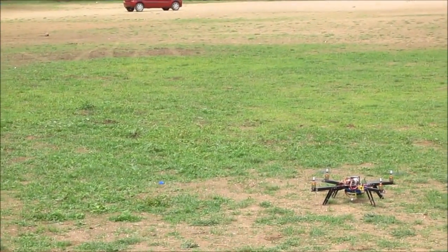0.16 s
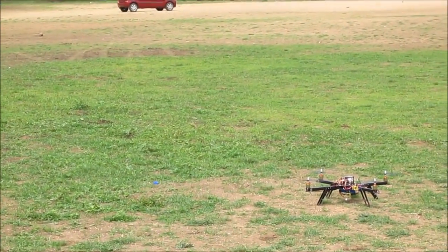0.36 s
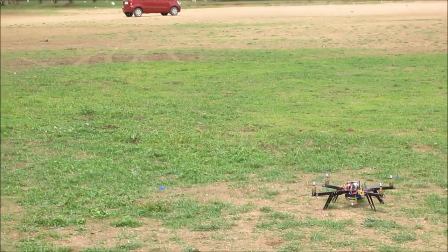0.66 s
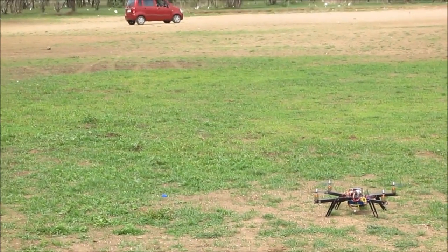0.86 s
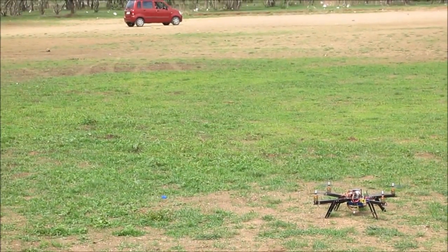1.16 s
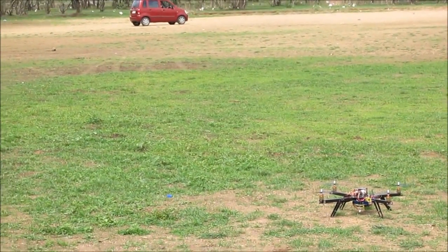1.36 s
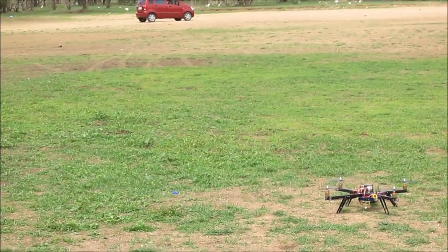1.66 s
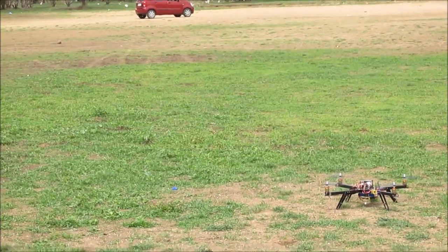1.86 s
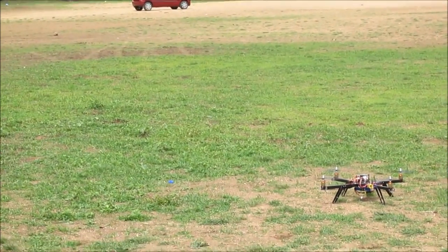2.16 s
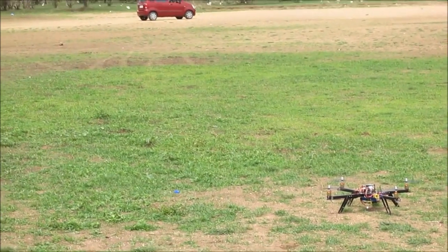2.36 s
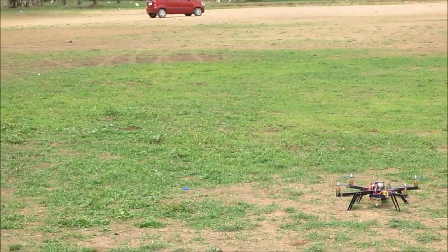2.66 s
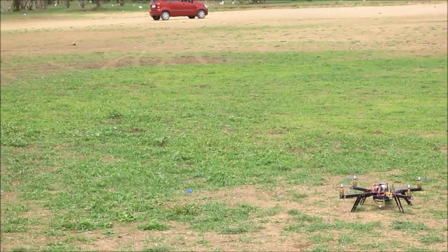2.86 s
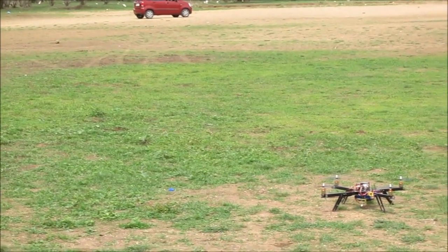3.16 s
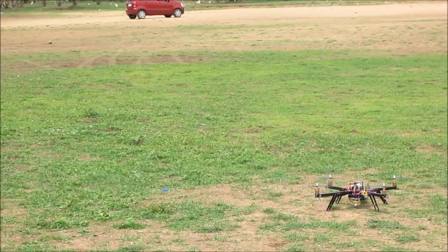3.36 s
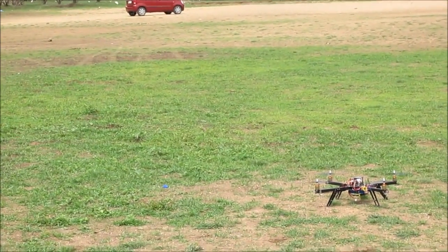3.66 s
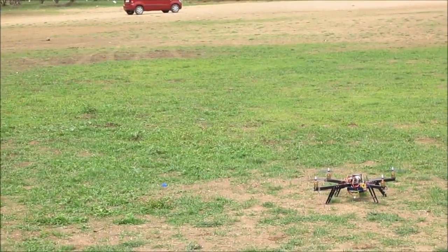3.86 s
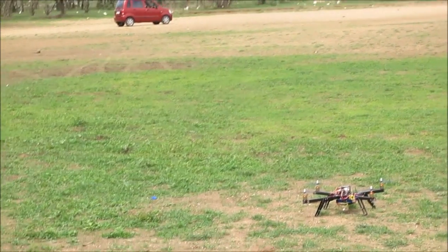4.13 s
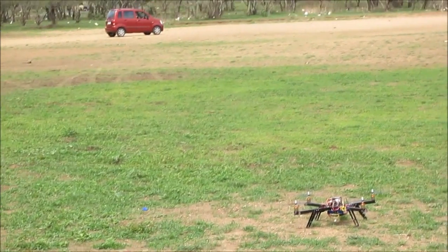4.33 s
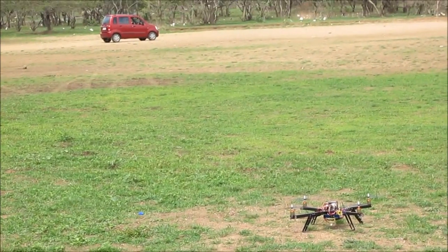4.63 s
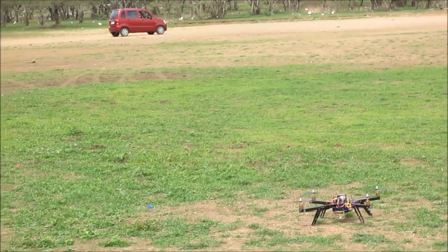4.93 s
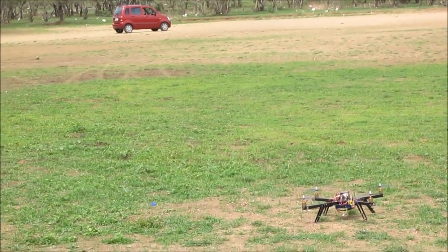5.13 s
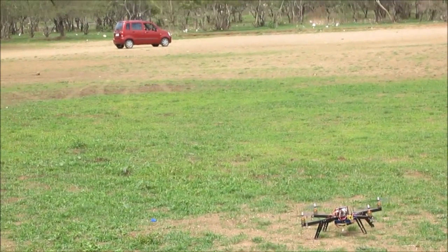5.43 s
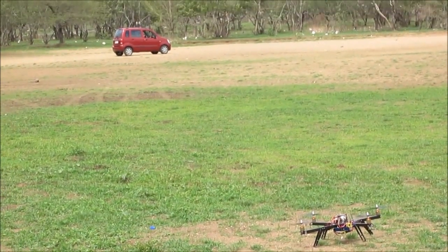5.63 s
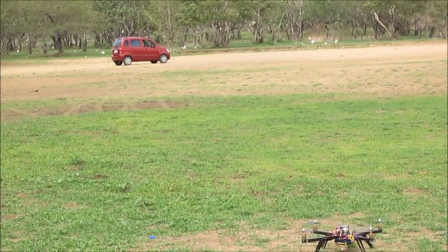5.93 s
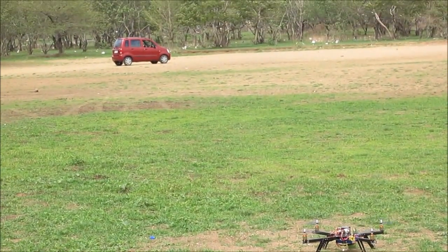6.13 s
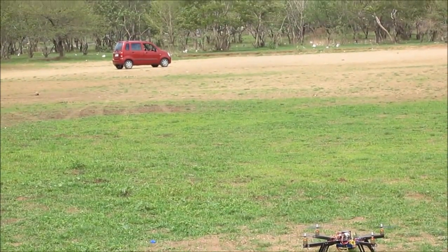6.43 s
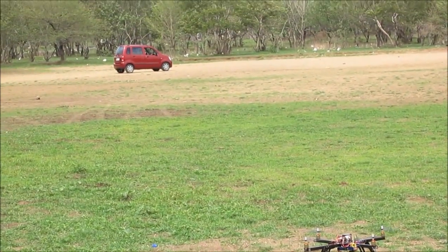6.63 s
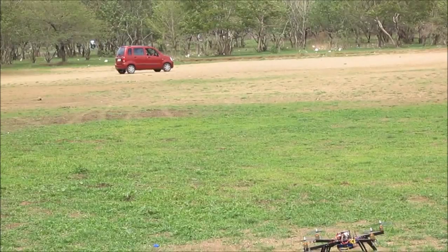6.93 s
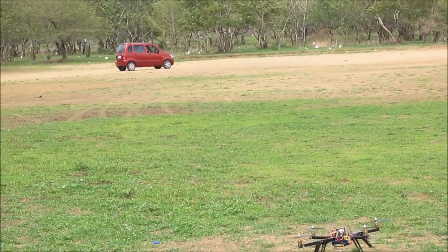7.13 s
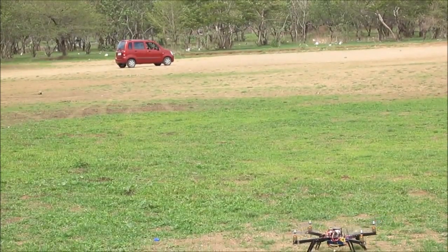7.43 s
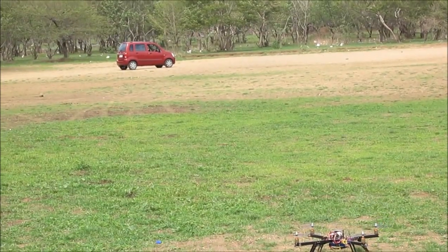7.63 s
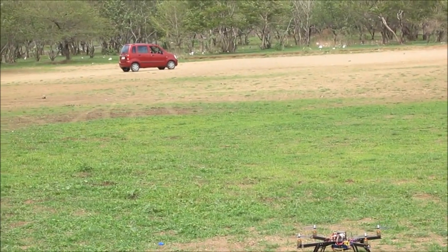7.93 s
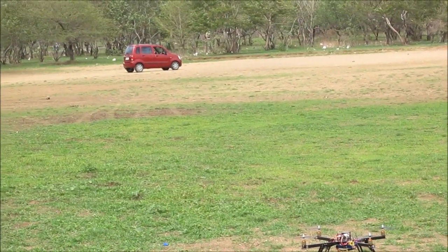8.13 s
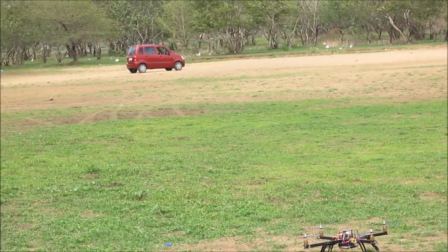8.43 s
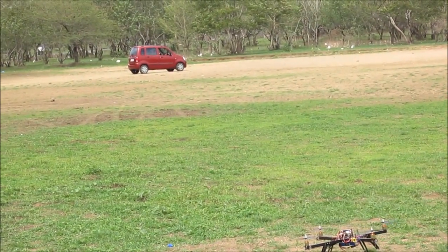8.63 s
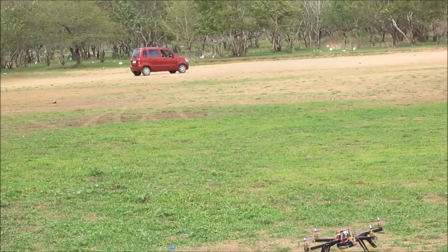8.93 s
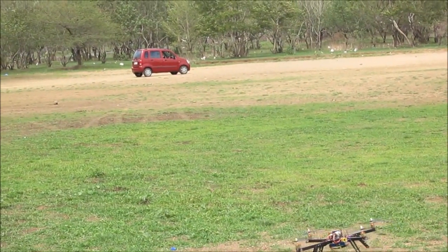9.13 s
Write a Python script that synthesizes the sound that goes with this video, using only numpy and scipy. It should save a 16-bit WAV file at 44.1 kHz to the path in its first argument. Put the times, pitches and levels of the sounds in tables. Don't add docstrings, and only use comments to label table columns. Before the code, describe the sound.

A multirotor idles on the ground, shrill electric whine and propeller hiss rising in strength under rumbling, buffeting wind on the microphone.

```python
import sys
import numpy as np
from scipy import signal
from scipy.fft import rfft, irfft, next_fast_len
from scipy.io import wavfile
from scipy.ndimage import uniform_filter1d, map_coordinates

SR = 44100
rng = np.random.default_rng(int(sys.argv[2]) if len(sys.argv) > 2 else 0)


def to_linear_factor(level_db):
    exponent = np.asarray(level_db, float) / 20
    return 10 ** exponent


def digitize_waveform(pressure):
    field = np.atleast_2d(pressure).T
    bounded = np.clip(field, -1, 1)
    quanta = np.round(bounded * 32767).astype(np.int16)
    wavfile.write(sys.argv[1], SR, quanta)


N = 409644

# time in seconds, commutation tone in Hz.
NEAR_MOTOR = [(0.0, 2730), (0.89, 2900), (1.45, 2970), (3.75, 3122), (4.67, 3262), (5.83, 3244),
              (6.27, 3062), (6.51, 3354), (6.75, 3394), (6.97, 3273), (7.07, 3310), (7.19, 3590),
              (7.55, 3186), (7.65, 2883), (8.19, 3256), (8.71, 3159), (8.89, 3308), (9.29, 3347)]
FAR_MOTOR = [(0.0, 2353), (0.91, 2515), (2.07, 2533), (5.31, 2946), (5.73, 3137), (5.85, 3090),
             (6.15, 2658), (6.31, 2645), (7.03, 3366), (7.09, 3370), (7.23, 3190), (7.31, 3335),
             (7.77, 2350), (8.07, 2647), (8.97, 3455), (9.13, 3461), (9.21, 3263), (9.29, 3380)]
# centre in seconds, length in seconds, shift in Hz.
NEAR_TRIMS = [(.5, .7, 30), (1.78, 0.61, -25), (2.34, 0.62, -45), (2.701, 0.45, -36), (3.28, 0.5, 74),
              (3.7, 0.6, 70), (4.142, 0.43, -64), (4.4, 0.33, -49), (4.697, 0.24, -25), (4.999, 0.43, -45),
              (5.241, 0.24, 62), (5.56, 0.44, -72), (5.84, 0.33, 39), (5.98, 0.24, -58), (6.119, 0.12, 122),
              (6.179, 0.44, -50), (6.502, 0.18, -36), (7.24, 0.18, -40), (7.439, 0.44, -515),
              (7.421, 0.069, -44.5), (7.475, .06, 10.5), (7.52, 0.047, -35), (7.54, 0.13, -163),
              (7.572, .05, -70), (7.635, .06, -45.5), (7.72, 0.22, -87), (8.28, 0.59, -16), (8.9, 0.25, 44),
              (9.02, 0.09, 68.5), (9.2, 0.24, 205.5)]
FAR_TRIMS = [(2.36, 0.61, -34), (3.181, 0.6, 39), (3.56, 0.6, 66), (4.7, 0.6, -66), (5.24, 0.25, -18),
             (6.1, 0.45, -140), (6.7, 0.45, -39), (7.18, 0.45, -61), (7.52, 0.6, -538), (8.44, 0.59, -100),
             (8.72, 0.6, -174), (8.86, 0.33, -32)]
# frequency in Hz, level in dB.
SING = [(2300, -55), (2550, -43.5), (2850, -42), (3030, -39), (3120, -31), (3200, -26), (3310, -32),
        (3570, -38.5)]
# centre in seconds, length in seconds, change in dB.
ACCENTS = [
    (.65, .25, -2.5),
    (2.6, .5, -2.5),
    (4.9, .15, 3),
    (5.65, .5, -2),
    (7.35, .2, -3),
    (7.57, .08, 5),
    (8.1, .6, 1.5),
]
# time in seconds, level in dB.
LOAD = [(0, -59), (.45, -57), (1.2, -55.5), (2.2, -53.5), (3.05, -51.5), (3.5, -50.5), (3.8, -48),
        (4.3, -45.5), (4.9, -46), (5.8, -43), (6.1, -47.5), (6.7, -42.5), (7.2, -47), (7.4, -48.5),
        (7.9, -45), (8.77, -44), (9, -43), (9.29, -44)]
# time in seconds, frequency in Hz.
SWITCH = [(0, 7766), (2.3, 7760), (5.5, 7750), (6.2, 7760), (7.3, 7745), (7.55, 7772), (8.4, 7756),
          (9.29, 7742)]
# centre in seconds, length in seconds, level in dB.
IN_STEP = [(0, 0.22, -45), (1.25, 0.59, -50), (2.2, .2, -44), (2.85, 0.21, -45), (3.3, 0.64, -42.5),
           (4.72, .15, -43), (5.8, .4, -47), (6.21, .1, -40), (6.5, .2, -39), (7.7, 0.5, -37.5),
           (8.05, 0.31, -38), (8.4, .4, -35), (8.87, .12, -40), (9.05, .15, -41)]
TONES = [(0, 7), (0, 8), (0, 9), (0, 10), (0, 12), (1, -9), (1, -8), (1, -7), (1, -6), (1, -4), (2, -1),
         (1, -2), (1, 2), (1, 3), (1, 4), (1, 6), (2, -3), (2, 0)]
TONE_DB = [
    [-14, -4, -3, -15, -11, -4, -10, -14, 0, -18, -31, -7, -1, -11, -13, -10, -19, -28],
    [-12, -7, -5, -9, -15, -5, -12, -13, -11, -16, -40, -5, -2, -13, -8, -2, -35, -28],
]
# centre in seconds, length in seconds, boost in dB.
BRAKING = [
    (6.25, .25, 10),
    (7.4, .2, 12),
    (7.72, 0.54, 7.5),
    (8.02, 0.46, 7),
]
# centre in seconds, length in seconds, change in dB.
COAST = [
    (7.46, 0.4, -18),
]
ORDER_SWELLS = {"near 7": [(5.3, .6, 6)], "near 8": [(6.25, .18, 14), (7.35, .14, 9)],
                "near -7": [(4, 2.2, 5)], "near 9": [(.3, .9, 3.5)], "far 10": [(.45, .55, 6)],
                "far 8": [(5.75, .45, 8), (6.83, .3, 10)], "far 9": [(8.13, .22, 7)],
                "far -9": [(.1, .7, -6), (6.15, .45, -10)], "near -6": [(6.75, .7, 4)]}
# time in seconds, pole tone in Hz.
THIRD_MOTOR = [(0, 880), (1, 912), (2, 930), (3.1, 960), (3.13, 875), (3.9, 885), (4.2, 865), (5.5, 870),
               (6.3, 840), (6.8, 885), (7.9, 860), (8.2, 905), (8.8, 870), (9.29, 870)]
THIRD_TONES = [(0, 2), (1, -2), (1, 2)]
THIRD_DB = [-1, -16, -10]
# frequency in Hz, gain in dB.
SHELL = [(2000, -8), (2800, -6), (3200, 3), (3550, 1), (3950, 6), (4400, 4), (4700, -4), (5000, -10),
         (6000, 0)]
# time in seconds, tone in Hz.
FOURTH_MOTOR = [(0, 3800), (5.8, 3830), (6.55, 3850), (6.72, 3700), (6.86, 3870), (7.06, 3900), (7.2, 3790),
                (7.28, 3830), (7.34, 3740), (7.79, 4000), (7.86, 4080), (8, 3880), (8.35, 3700),
                (8.65, 3850), (8.78, 3780), (9.1, 3770), (9.22, 3750), (9.29, 3920)]
# centre in seconds, length in seconds, level in dB.
FOURTH_HEARD = [(5.82, .2, -46), (6.5, .2, -46), (6.95, 0.62, -41), (7.23, .3, -41), (7.85, .16, -38.5),
                (7.95, .2, -45), (8.6, 0.66, -43), (9.02, .3, -40), (9.26, .12, -41)]
# time in seconds, tone in Hz.
FIFTH_MOTOR = [(6.04, 4060), (6.08, 3930), (6.19, 3650), (6.27, 3880), (6.42, 4100), (6.5, 3980),
               (7.38, 4450), (7.445, 3860), (7.5, 3900), (7.56, 4100), (7.6, 4450)]
# centre in seconds, length in seconds, level in dB.
FIFTH_HEARD = [
    (6.06, .08, -42),
    (6.3, .3, -43),
    (7.42, .1, -41),
    (7.52, .18, -42),
]

# frequency in Hz, density in dB per Hz.
WASH = [(88, -20), (150, -4), (436, -12.5), (864, -8.5), (2940, -11), (3240, -11.5), (3580, -16),
        (4500, -28.5), (5850, -60), (9900, -120)]
HISS = [(1400, -17.5), (2300, -42), (3100, -10.5), (4050, -4), (5000, -6.5), (6000, -8), (7200, -9.5),
        (8000, -5), (9000, -7.5), (11000, -13), (13700, -22.5), (15100, -28), (15400, -38)]
# frequency in Hz, left-right likeness from 0 to 1.
AIR_ALIKE = [(200, 1), (1000, 0.85), (2000, 0.76), (4000, 0.95), (6000, .93), (8000, 0.94), (12000, 0.91)]
# centre in seconds, length in seconds, change in dB.
PUFFS = [(.47, 0.18, 4), (1.15, .12, 1.5), (1.6, .25, 2.5), (2.4, 0.16, 1.5), (3.1, 0.55, 2),
         (4.57, .15, -1.5), (4.72, .15, 1), (4.92, 0.22, -1.5), (6.05, .15, 1.5), (6.3, .15, 1.5),
         (6.46, 0.11, -1.5), (7.2, .3, 1.5), (5.7, 0.41, -1), (8.25, .2, -1), (8.92, 0.24, 1)]
# centre in seconds, length in seconds, level in dB.
SWISH = [
    (1.2, 0.98, -45.5),
    (4.8, .9, -43),
    (7.45, .6, -42),
    (9.2, .7, -41.5),
]

# time in seconds, strength in dB.
BREEZE = [(0, -47), (.6, -40.5), (1.1, -51), (2.3, -51), (3.25, -36), (3.7, -42), (4.3, -33), (5.3, -36),
          (5.5, -40.5), (5.84, -27.5), (6.1, -32), (6.3, -48.5), (6.85, -35), (7.76, -37.5), (8.9, -36.5),
          (9.29, -42.5)]
# peak in seconds, buffet in dB, seconds to fall 20 dB, flutter over buffet in dB.
GUSTS = [(.02, -31, .06, -2), (.26, -33, 0.2, -4), (.39, -29.5, 0.23, -15.5), (.5, -24, 0.16, -9),
         (.72, -30.5, 0.1, -4), (.77, -23.5, 0.06, -3.5), (.86, -28, 0.05, -10), (.95, -30, 0.16, -5),
         (1.16, -37, .06, -18), (1.3, -35.5, 0.1, -13), (1.41, -30, 0.1, -20), (1.62, -25, 0.18, -7),
         (1.685, -16, 0.01, -2.5), (1.73, -21, 0.19, -1.5), (1.81, -20.5, 0.19, -3.5),
         (1.89, -21, 0.16, -2), (1.95, -25, 0.14, -3), (2.03, -26, 0.2, -3), (2.09, -30, 0.14, -8),
         (2.37, -24.5, 0.03, -7), (2.46, -22.5, 0.14, -16), (2.74, -30, 0.22, -14),
         (3.14, -24.5, 0.03, -12), (3.39, -27.5, 0.12, -11), (3.54, -27.5, 0.19, -11.5),
         (3.83, -26.5, 0.17, -11.5), (4.0, -30.5, 1, -18), (4.14, -25, 0.05, -4), (4.43, -26.5, .2, -15),
         (4.55, -23, 0.36, -9.5), (4.85, -20.5, 0.23, -10.5), (5.41, -28.5, 0.1, -21),
         (5.91, -14.5, 0.16, -8.5), (6.03, -24.5, .2, -11), (6.11, -25, .1, -13), (6.63, -24.5, 0.24, -23),
         (6.75, -24, 0.13, -8), (6.5, -28.5, .1, -19), (6.85, -27.5, .1, -18), (7.1, -28, .2, -22),
         (7.34, -32, 0.1, -20), (7.46, -26, 0.05, -20), (7.84, -26, 0.1, -13), (7.89, -24, 0.04, -13),
         (8.07, -27.5, 0.36, -11.5), (8.41, -21, 0.28, -19), (8.5, -24.5, 0.34, -23), (8.8, -30, .15, -22)]
# frequency in Hz, density in dB per Hz.
RUMBLE = [(12, -30), (25, -15), (45, -7.5), (70, -0.5), (110, -5.5), (200, -52)]
BUFFET = [(30, -43), (70, -7), (125, 1), (200, -4.5), (280, -13), (450, -26.5), (900, -64)]
FLUTTER = [(120, -49), (250, -0.5), (600, -10.5), (1100, -23.5), (2200, -38), (4000, -90)]
# frequency in Hz, left-right likeness from 0 to 1.
PORT_ALIKE = [(30, .68), (90, .72), (170, .84), (300, .72), (600, .6)]
# frequency in Hz, left lead in radians.
PORT_PHASE = [(250, 0), (430, .5), (700, 3), (1150, 3), (1900, 0)]
# frequency in Hz, lean to the left in dB.
PORT_PAN = [(30, 1.1), (125, .5), (300, .1), (600, -1.4), (1500, -.2)]
# start in seconds, crack peak in dB, crack pitch in Hz, push in dB over the crack.
POPS = [(0.143, -30, 1040, -16), (.372, -30, 1100, -5), (.402, -32, 398, 15), (0.437, -28, 450, 7),
        (0.495, -24, 494, -5), (0.516, -12, 786, -1.5), (0.687, -34, 549, 4), (0.709, -27, 482, 4),
        (0.76, -16, 686, -4), (0.964, -27, 524, 0), (1.601, -29, 483, 13), (1.682, -15.5, 495, 9.5),
        (1.709, -18, 498, -2), (1.79, -19, 740, 1), (1.81, -24, 490, 5), (1.856, -25, 400, 10),
        (1.881, -25, 520, -10), (1.903, -11.5, 625, -12), (1.949, -24, 503, 6), (1.982, -28, 450, 9),
        (2.36, -29, 565, 4), (2.428, -32.5, 528, 10), (3.13, -35, 509, 4), (3.558, -27, 578, 10.5),
        (4.132, -24, 700, 13), (4.146, -27, 690, 9), (4.515, -28, 481, 10), (4.79, -19, 600, 3),
        (4.838, -16.5, 480, 3), (5.387, -27.5, 470, 7.5), (5.903, -14, 563, 2), (5.913, -15, 536, 11),
        (6.753, -24, 568, 3), (7.33, -37, 300, 16), (7.835, -34, 400, 14), (7.893, -34, 450, 17),
        (4.388, -32, 450, 0), (4.674, -25, 600, 2)]
# start in seconds, peak in dB, pitch in Hz.
THUMPS = [(0.242, -23, 183), (1.388, -23, 145), (1.619, -15, 202), (1.681, -5, 148), (1.847, -12, 124),
          (2.019, -19, 127), (2.129, -27, 108), (2.537, -24, 145), (2.669, -24, 118), (2.721, -20, 113),
          (3.028, -24, 116), (3.797, -19, 94.2), (3.947, -22, 91.5), (4.058, -20, 102), (4.159, -15, 116),
          (4.269, -20, 91.5), (4.42, -20, 124), (4.548, -10, 102), (4.859, -13, 116), (5.199, -24, 121),
          (5.594, -23, 210), (5.632, -20, 91.5), (5.827, -20, 118), (5.969, -14, 105), (6.004, -18, 118),
          (6.599, -18, 108), (7.45, -21, 113), (8.064, -16, 129), (8.181, -21, 143), (8.563, -19, 110)]

# start in seconds, peak in dB.
TICKS = [
    (1.314, -30.5),
    (1.447, -31),
    (3.673, -23.5),
    (3.852, -29),
    (4.249, -22),
    (5.143, -26),
    (5.242, -29),
]
# centre in seconds, length in seconds, level in dB.
RASP = [(3, 0.36, -40.5), (3.27, 0.31, -42.5), (4.05, 1, -48), (5.45, 1, -45), (6.05, .2, -50),
        (6.35, .25, -47), (6.8, 0.29, -51), (7.15, .3, -47), (7.6, .2, -54), (8.1, .3, -54),
        (8.55, 0.36, -48), (8.95, .3, -41), (9.25, .15, -46)]
# centre in Hz, width in Hz, level in dB.
RASP_BANDS = [(9340, 300, -5), (9620, 350, 0), (10970, 350, -5), (12300, 370, -8)]

CONTROL_STEP = 64


def along(points, hz):
    f, v = np.transpose(points)
    return np.interp(np.log(hz + 1), np.log(f + 1), v)


def curves(rows):
    s, *cols = np.transpose(rows)
    return [np.interp(np.arange(N) / SR, s, c) for c in cols]


def wobble(rate):
    knots = rng.standard_normal(int(N * rate / SR) + 4)
    return map_coordinates(knots, [np.arange(N) * rate / SR], order=1)


def humps(rows):
    s, length, size = np.transpose(rows)[:, :, None]
    t = np.arange(0, N, CONTROL_STEP) / SR
    return np.cos(np.pi * np.clip((t - s) / length, -.5, .5)) ** 2, size


def fine(x):
    return np.interp(np.arange(N) / CONTROL_STEP, np.arange(len(x)), x)


def shifts(rows):
    shape, size = humps(rows)
    return fine((shape * size).sum(axis=0))


def swells(rows):
    shape, db = humps(rows)
    return fine(np.sqrt((shape * to_linear_factor(db) ** 2).sum(axis=0)))


def phase(hz):
    return 2 * np.pi * np.cumsum(uniform_filter1d(hz, size=300)) / SR


def filtered(x, response):
    m = next_fast_len(N + 8192)
    return irfft(rfft(x, m) * response(np.fft.rfftfreq(m, 1 / SR)), m)[..., :N]


def band(x, lo_hz, hi_hz):
    return signal.lfilter(*signal.butter(3, [lo_hz / SR * 2, hi_hz / SR * 2], "band"), x)


def noise_pair(source, spectrum, alike):
    def mid_side(hz):
        turn = np.arccos(np.clip(along(alike, hz), -1, 1)) / 2
        return to_linear_factor(along(spectrum, hz)) * [np.cos(turn), np.sin(turn)]
    mid, side = filtered(source, mid_side)
    return np.array([mid + side, mid - side]) / np.std(mid)


def load_over_reference():
    return curves(LOAD)[0] + 48


def switching_tone(carrier, load_db):
    level = np.hypot(to_linear_factor(-50 + .4 * load_db), swells(IN_STEP))
    return level * to_linear_factor(3.5 + 2 * wobble(9)) * np.sin(carrier)


def commutation(hz, turn, steps, db, pan_db, lag):
    pull = uniform_filter1d(np.gradient(hz) * SR, size=900) / 3400
    db = db + 3.5 * np.tanh(pull)
    flicker = to_linear_factor(db + 3 + 0.74 * wobble(50) + 0.59 * np.sin(turn / 7))
    return flicker * to_linear_factor([[pan_db], [-pan_db]]) * np.sin(6 * turn + steps + [[lag], [-lag]])


def orders(which, turn, carrier, load_db, drive_db):
    out = to_linear_factor(drive_db - 9) * np.cos(turn / 7) * np.sin(carrier)
    power_db = drive_db + which * shifts(COAST)
    for (c, k), tone_db in zip(TONES, TONE_DB[which]):
        extra_db = np.zeros(N)
        if c == 0:
            extra_db += -0.34 * (load_db + 6)
        if k == (-9, 9)[which]:
            extra_db += shifts(BRAKING)
        name = ("near ", "far ")[which] + str(k)
        if name in ORDER_SWELLS:
            extra_db += shifts(ORDER_SWELLS[name])
        out += to_linear_factor(power_db + extra_db + tone_db + 2.4 * wobble(5)) * np.sin(c * carrier + k * turn)
    return out


def high_whistles(carrier, far_turn):
    folded = np.sin(phase(np.full(N, 31960)) - 2 * carrier - 3 * far_turn)
    whistle = np.sin(phase(np.full(N, 15720)))
    return to_linear_factor(-68 + 2 * wobble(4)) * folded + to_linear_factor(-76 + 3 * wobble(6)) * whistle


def third_motor(carrier, drive_db):
    turn = phase(curves(THIRD_MOTOR)[0]) / 2
    out = np.zeros(N)
    for (c, k), db in zip(THIRD_TONES, THIRD_DB):
        out += to_linear_factor(drive_db + db + 2.5 + 2.7 * wobble(4)) * np.sin(c * carrier + k * turn)
    return out


def bell(x):
    return filtered(x, lambda hz: to_linear_factor(along(SHELL, hz)) * np.exp(np.outer([.15j, -.15j], np.sin(hz / 700))))


def motors():
    load_db = load_over_reference()
    drive_db = -47.2 + .6 * load_db
    carrier = phase(curves(SWITCH)[0])
    steps = 0.25 * to_linear_factor(3 * wobble(9.1)) * np.sin(phase(50 + 4 * wobble(3.7)))
    sung, faint = np.zeros((2, N)), switching_tone(carrier, load_db)
    pair = [(NEAR_MOTOR, NEAR_TRIMS, 0, -.8, .15), (FAR_MOTOR, FAR_TRIMS, -3.5, .4, -.1)]
    for which, (ride, trims, trim_db, pan_db, lag) in enumerate(pair):
        hz = curves(ride)[0] + shifts(trims)
        turn = phase(hz + 4 * wobble(60) + 4 * wobble(14)) / 6
        db = along(SING, hz) + trim_db + 0.72 * load_db + (1 - which) * shifts(ACCENTS)
        sung += commutation(hz, turn, steps, db, pan_db, lag)
        faint += orders(which, turn, carrier, load_db, drive_db)
    faint += high_whistles(carrier, turn) + third_motor(carrier, drive_db)
    return sung + bell(faint)


def props():
    load_db = load_over_reference()
    swell = 0.8 * wobble(8) + shifts(PUFFS)
    wash = noise_pair(rng.standard_normal((2, N)), WASH, AIR_ALIKE)
    wash *= np.hypot(to_linear_factor(-46 + 0.76 * load_db + 5.5), swells(SWISH)) * to_linear_factor(swell)
    hiss = noise_pair(to_linear_factor(1.3 * wobble(300)) * rng.standard_normal((2, N)), HISS, AIR_ALIKE)
    low = filtered(hiss, lambda hz: 1 / (1 + (hz / 8500) ** 6))
    tips = to_linear_factor(-44 + 0.94 * load_db + 7.5 + swell) * (hiss - low) * to_linear_factor([[.35], [-.35]])
    return wash + to_linear_factor(load_db - 48 + 7.0 + swell) * low + tips


def spread(x):
    mid = x.mean(axis=0)
    side = (x[0] - x[1]) / 2 * to_linear_factor(2.2 * wobble(11))
    return np.array([mid + side, mid - side])


def ports(x):
    def response(hz):
        lead = np.exp(np.outer([.5j, -.5j], along(PORT_PHASE, hz)))
        return lead * to_linear_factor(np.outer([1, -1], along(PORT_PAN, hz)))
    return filtered(x, response)


def gusts():
    s, db, fall_s, sharp_db = np.transpose(GUSTS)[:, :, None]
    since = np.arange(0, N, CONTROL_STEP) / SR - s
    fall_db = 20 * np.maximum(since, -1.19 * since) / fall_s
    breeze_db, = curves(BREEZE)
    buffet_db = np.maximum(breeze_db, fine((db - fall_db).max(axis=0)))
    flutter_peaks = db + sharp_db - 1.41 * fall_db
    flutter_db = np.maximum(breeze_db - 14, fine(flutter_peaks.max(axis=0)))
    return breeze_db, buffet_db, flutter_db


def wind():
    breeze_db, buffet_db, flutter_db = gusts()
    lumps = wobble(25)
    slow_breeze_db = uniform_filter1d(breeze_db, size=SR) + 40.5
    slow_buffet_db = uniform_filter1d(buffet_db, size=4000) + 31.5
    rumble_db = -38 + 0.48 * slow_breeze_db + 0.57 * slow_buffet_db
    heave = to_linear_factor(2.0 * lumps + 1.7 * wobble(6))
    rumble = noise_pair(heave * rng.standard_normal((2, N)), RUMBLE, PORT_ALIKE)
    eddies = to_linear_factor(1.4 * lumps + 2.4 * wobble(60))
    buffet = noise_pair(eddies * rng.standard_normal((2, N)), BUFFET, PORT_ALIKE)
    spikes = eddies * to_linear_factor(4.1 * wobble(110))
    flutter = noise_pair(spikes * rng.standard_normal((2, N)), FLUTTER, PORT_ALIKE)
    return ports(to_linear_factor(rumble_db) * rumble + to_linear_factor(buffet_db + 0.17) * buffet + to_linear_factor(flutter_db + 0.5) * flutter)


def pops():
    out, t = np.zeros((2, N + SR)), np.arange(SR // 20) / SR
    swell = (t / 0.0058) ** 2 * np.exp(2 - 2 * t / 0.0054)
    snap_shape = (t / .004) ** 2 * np.exp(2 - 2 * t / 0.0038)
    for s, db, hz, push_db in POPS:
        start = rng.uniform(0, 5.5) + rng.normal(0, 0.31, (2, 1))
        push = swell * np.sin(2 * np.pi * 0.39 * hz * t + start)
        noise = rng.standard_normal(len(t)) + 0.76 * rng.standard_normal((2, len(t)))
        snap = band(noise, hz / 1.73, hz * 1.7) * snap_shape
        pop = to_linear_factor(push_db - 2.5) * push + to_linear_factor(6.0) * snap / np.abs(snap).max()
        out[:, round(s * SR):][:, :len(t)] += to_linear_factor(db) * pop
    return ports(out[:, :N])


def thumps():
    out, t = np.zeros((2, N + SR)), np.arange(SR // 10) / SR
    for s, db, hz in THUMPS:
        start, left, right = rng.standard_normal(3)
        u = 2 * t * hz / 1.6
        push = np.sin(2 * np.pi * hz * t + 2 * start + .35 * np.array([[left], [right]]))
        out[:, round(s * SR):][:, :len(t)] += to_linear_factor(db - .6) * u ** 2 * np.exp(2 - 2 * u) * push
    return ports(out[:, :N])


def ticks():
    out, t = np.zeros(N + SR), np.arange(SR // 20) / SR
    for s, db in TICKS:
        tick = band(rng.standard_normal(len(t)), 780, 1430) * (t / .004 * np.exp(1 - t / 0.0028))
        out[round(s * SR):][:len(t)] += to_linear_factor(db) * tick / np.abs(tick).max()
    return out[:N] * [[1.3], [.7]]


def rasp():
    def bands(hz):
        return sum(to_linear_factor(db) / (1 + ((hz - c) / w * 2) ** 4) for c, w, db in RASP_BANDS)
    rattle = filtered(rng.standard_normal(N), bands)
    rattle /= np.sqrt(np.mean(rattle ** 2) + 1e-20)
    return swells(RASP) * rattle * [[1.17], [.83]]


def correcting_motor(ride, heard):
    return swells(heard) * to_linear_factor(2 * wobble(20)) * np.sin(phase(curves(ride)[0] + 8 * wobble(30)))


def scene():
    machine = motors() + spread(props())
    weather = wind() + pops() + thumps()
    late_motors = correcting_motor(FOURTH_MOTOR, FOURTH_HEARD) + correcting_motor(FIFTH_MOTOR, FIFTH_HEARD)
    return machine + weather + ticks() + rasp() + late_motors


def roll_off(x):
    return signal.sosfilt(signal.butter(12, 16040, fs=SR, output="sos"), x)


def record(dry):
    threshold_db, strength, recovery_s, top_hz = -20.5, 2.3, 0.24, 15790
    power = np.abs(uniform_filter1d((dry ** 2).mean(axis=0), size=441))
    over_db = np.maximum(10 * np.log10(power + 1e-12) - threshold_db, 0)
    keep = np.exp(-1 / (recovery_s * SR))
    duck_db = signal.lfilter([1 - keep], [1, -keep], over_db)
    duck_db = np.pad(duck_db, (SR // 60, 0))[:N]
    mix = filtered(dry * to_linear_factor(-strength * duck_db), lambda hz: hz < top_hz)
    return roll_off(mix)


dry = scene()
out = record(dry)
digitize_waveform(out)
```